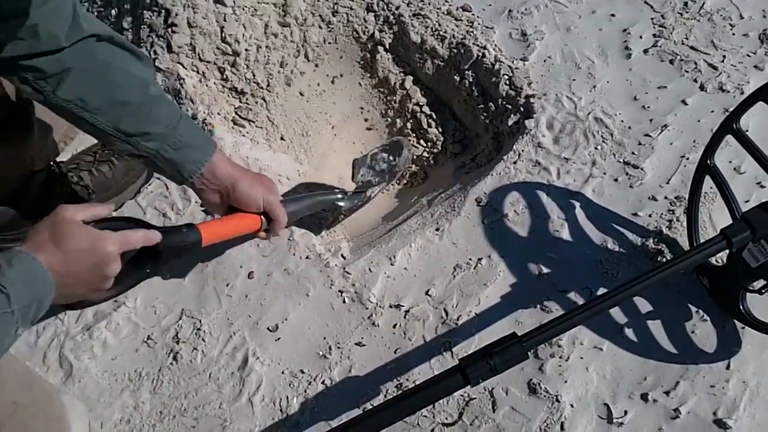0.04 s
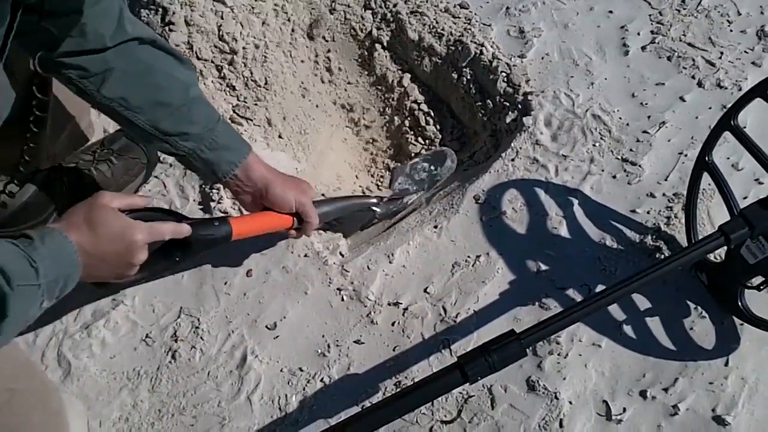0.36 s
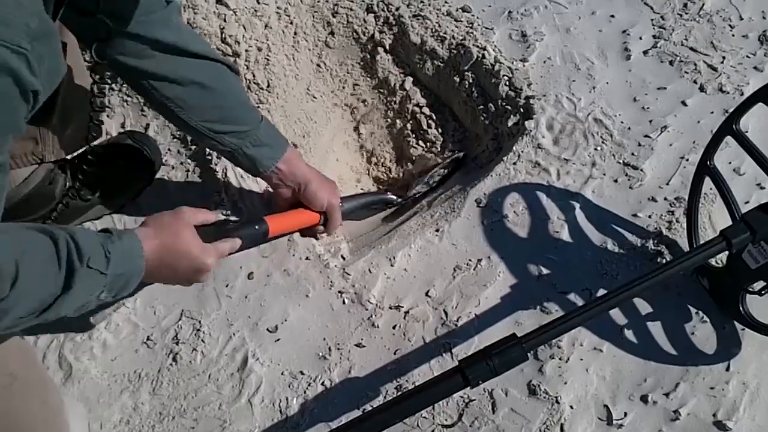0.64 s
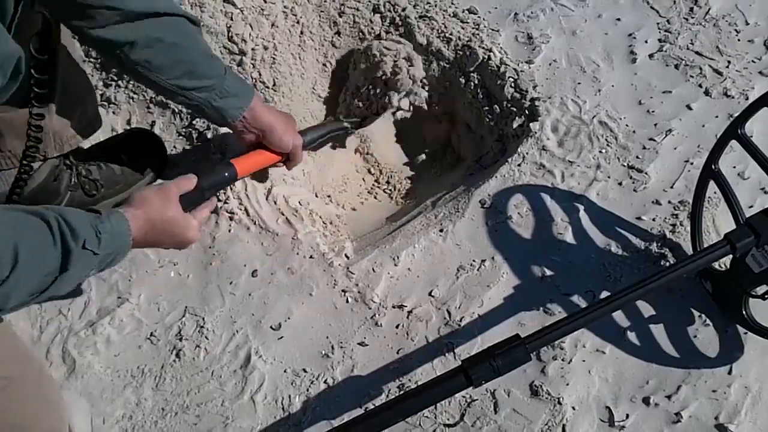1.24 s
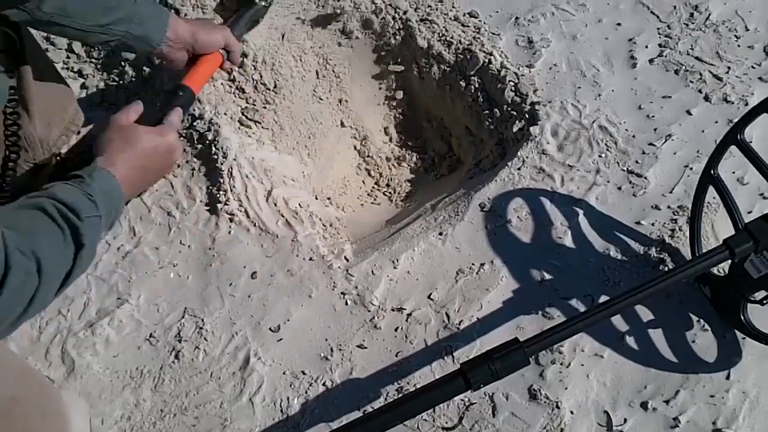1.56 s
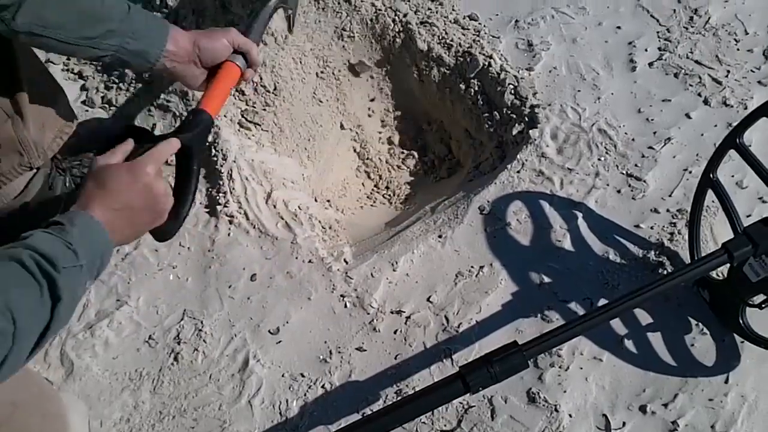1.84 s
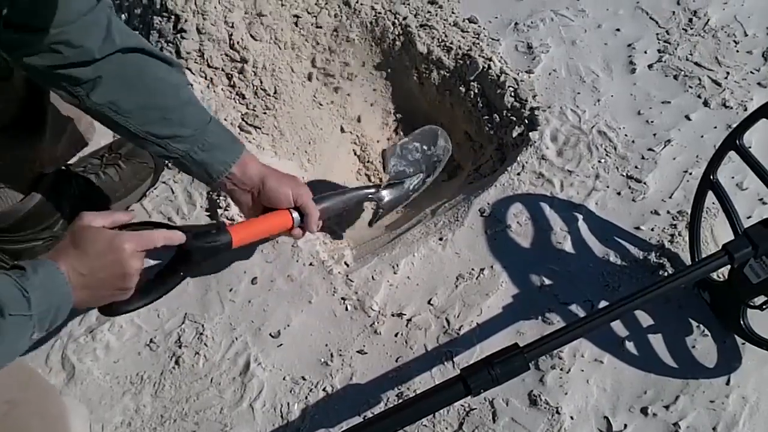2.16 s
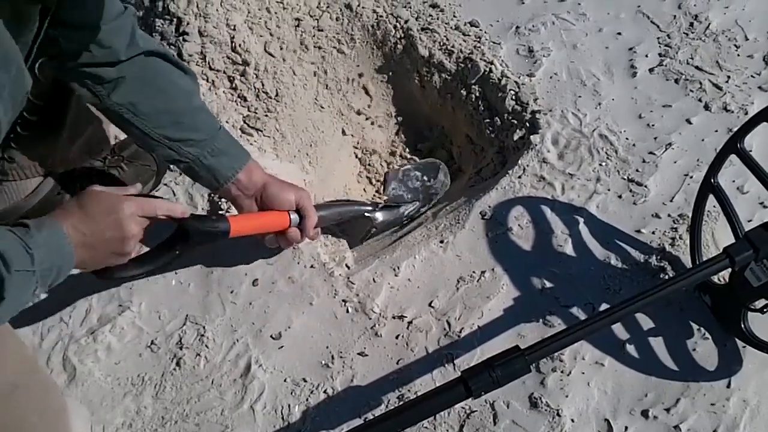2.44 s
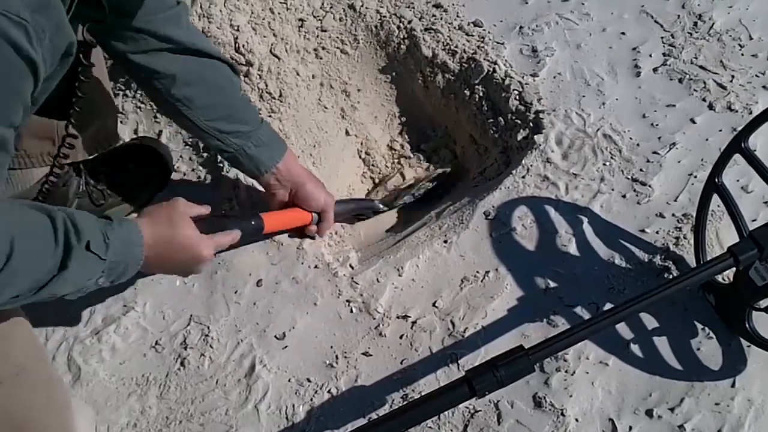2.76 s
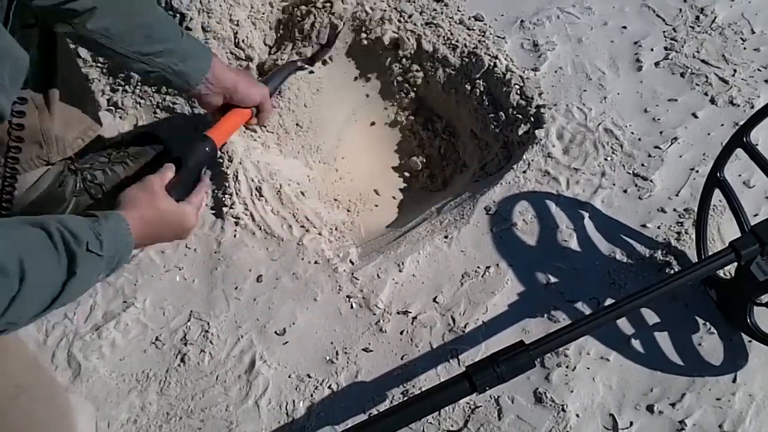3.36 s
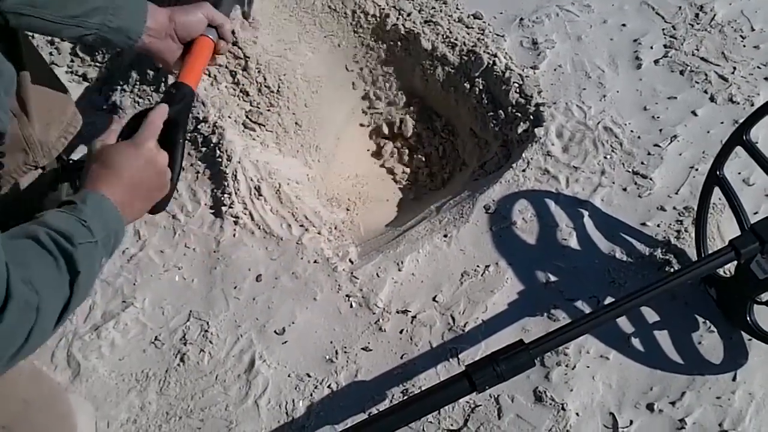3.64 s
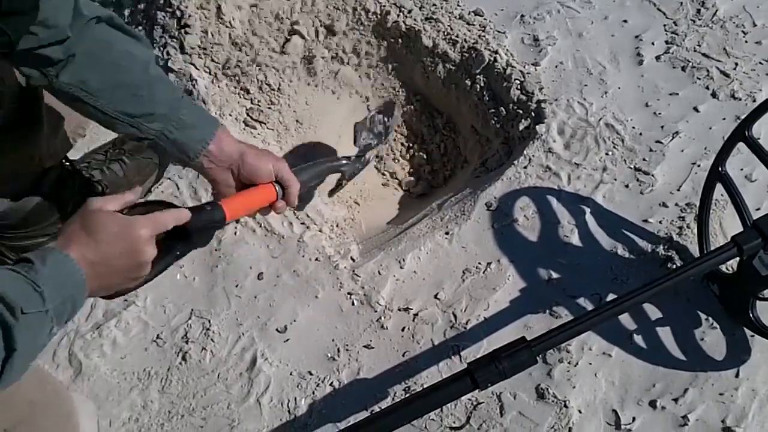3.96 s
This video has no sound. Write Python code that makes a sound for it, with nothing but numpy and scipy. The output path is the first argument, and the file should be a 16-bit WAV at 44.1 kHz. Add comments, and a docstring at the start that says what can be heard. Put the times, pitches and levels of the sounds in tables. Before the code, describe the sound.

Two gritty shovel scoops in dry sand, close by, over gusty wind rumble.

```python
"""Outdoors on dry sand, a short steel shovel digs twice, close by. Friction among the grains makes a
swelling hiss as the blade pushes in; then it lifts its load, and sand crumbles and slides off the edges.
The rubbed steel rings and rasps, and a little loose sand spills. Turbulent wind strikes the microphone
in gusts and single eddies, over a faint outdoor hush."""
import sys
import numpy as np
from scipy.fft import rfft, irfft, next_fast_len
from scipy.io import wavfile
from scipy.ndimage import uniform_filter1d, map_coordinates

SR = 44100
rng = np.random.default_rng(int(sys.argv[2]) if len(sys.argv) > 2 else 0)


def wav_record(signal):
    """Record a signal, one row per channel, as 16-bit PCM in the file named by sys.argv[1]."""
    frames = np.transpose(np.atleast_2d(signal))
    bounded = np.clip(frames, -1, 1)
    # unit amplitude maps onto the largest positive 16-bit level
    quanta = np.round(bounded * 32767).astype(np.int16)
    wavfile.write(sys.argv[1], SR, quanta)


N = 176400
t = np.arange(N) / SR


def amp(db):
    """Amplitude ratio of a level in decibels."""
    return 10 ** (np.asarray(db) / 20)


def unit(x):
    """Normalisation to an rms of 1."""
    return x / np.sqrt(np.mean(x ** 2) + 1e-20)


def contour(points):
    """Linear interpolation of a level in dB over time, silent outside its points."""
    return np.interp(t, *np.transpose(points), left=-120, right=-120)


def pulse(centre_s, sigma_s):
    """Gaussian envelope with a peak of 1."""
    return np.exp(-.5 * ((t - centre_s) / sigma_s) ** 2)


def wobble(knots_per_s):
    """Smooth random modulation: a spline through soft-limited knots."""
    knots = 2 * np.tanh(rng.standard_normal(int(N * knots_per_s / SR) + 4) / 2)
    return map_coordinates(knots, [np.arange(N) * knots_per_s / SR])


def filtered(x, response):
    """Linear filtering: the spectrum is multiplied by a frequency response."""
    size = next_fast_len(N + SR // 2)
    return irfft(rfft(x, size) * response(np.fft.rfftfreq(size, 1 / SR)), size)[:N]


def coloured(x, points):
    """Spectral shaping by (Hz, dB) points joined on a logarithmic frequency axis."""
    f, db = np.transpose(points)
    return filtered(x, lambda hz: amp(np.interp(np.log(hz + 1), np.log(f + 1), db)))


def noise(spectrum):
    """Coloured Gaussian noise at rms 1."""
    return unit(coloured(rng.standard_normal(N), spectrum))


def grains(spectrum, per_s, scatter_db, clump_db, clumps_per_s):
    """Shot noise at rms 1: tiny random collisions of uneven size, swelling in clumps."""
    hits = (rng.random(N) < per_s / SR) * rng.standard_normal(N)
    size_db = scatter_db * np.clip(rng.standard_normal(N), -2, 2) + clump_db * wobble(clumps_per_s)
    return unit(coloured(hits * amp(size_db), spectrum))


def resonant(hz, width_hz):
    """A resonance driven by friction: narrow-band noise at rms 1, whose centre may move."""
    phase = 2 * np.pi * np.cumsum(hz * np.ones(N)) / SR
    lowpass = lambda f: 1 / (1 + 1j * f / (0.67 * width_hz)) ** 2
    drift = lambda: filtered(rng.standard_normal(N), lowpass)
    return unit(drift() * np.cos(phase) + drift() * np.sin(phase))


# The sand's hiss, one table per scoop. Each row: time in seconds, relative level in dB.
HISS_LEVELS = [
    [(0.36, -85), (0.372, -51.5), (0.394, -56), (0.42, -47.5), (0.538, -41), (0.564, -35), (0.77, -38),
     (0.818, -50.5), (0.828, -46), (0.89, -39.5), (0.994, -41), (1.02, -47), (1.054, -41), (1.118, -38.5),
     (1.154, -48.5), (1.2, -37.5), (1.242, -41.5), (1.326, -39.5), (1.336, -42.5), (1.418, -45.5),
     (1.448, -59), (1.458, -51), (1.502, -51.5), (1.512, -68), (1.53, -69)],
    [(2.37, -79), (2.376, -105), (2.384, -53), (2.39, -44), (2.464, -40.5), (2.478, -43.5), (2.63, -33),
     (2.746, -34), (2.88, -43), (2.93, -39), (3.028, -48), (3.094, -42.5), (3.118, -46.5), (3.17, -40.5),
     (3.194, -43), (3.216, -43), (3.246, -45), (3.264, -43.5), (3.32, -46.5), (3.39, -48), (3.434, -56),
     (3.452, -85), (3.46, -64)],
]
# One entry per scoop: the time in seconds at which the push turns into the lift.
LIFT_TIMES = [0.785, 2.82]
# Spectra of sand rubbing on the blade, sand sliding off it and clods breaking up.
# Each row: frequency in Hz, relative spectral density in dB.
PUSH_SPECTRUM = [(300, -44), (700, -17.5), (1100, -9), (1450, -12), (1800, -6.5), (2200, -5), (3200, -0.5),
                 (4400, 4), (6200, -4.5), (9400, -5.5), (12000, -8), (15000, -21)]
SLIDE_SPECTRUM = [(300, -16), (700, -5.5), (1200, -7), (1800, -7), (2300, -5), (3600, 1), (4600, 2),
                  (6300, -5), (9500, -6.5), (12000, -9), (15000, -16)]
CRUMBLE_SPECTRUM = [(200, 5), (500, -4.5), (850, -9.5), (1300, 1.5), (2200, 14), (5000, -45)]


def digging(turn_s=0.14, push_db=6.5, slide_db=4):
    """Granular friction: sand rubs on the entering blade, then slides off; clods crumble throughout."""
    out = np.zeros(N)
    for levels, lift_s in zip(HISS_LEVELS, LIFT_TIMES):
        hiss_db = contour(levels)
        lifted = .5 + .5 * np.tanh((t - lift_s) / turn_s)
        push = grains(PUSH_SPECTRUM, per_s=16000, scatter_db=0.5, clump_db=0.82, clumps_per_s=160)
        slide = grains(SLIDE_SPECTRUM, per_s=9000, scatter_db=-3, clump_db=2.0, clumps_per_s=80)
        clods = grains(CRUMBLE_SPECTRUM, per_s=2500, scatter_db=3, clump_db=6.5, clumps_per_s=60)
        hiss = amp(push_db) * np.sqrt(1 - lifted) * push + amp(slide_db) * np.sqrt(lifted) * slide
        crumble_db = -58.5 + 0.76 * (hiss_db + 40)  # grows more slowly than the hiss
        out += amp(hiss_db) * hiss + amp(crumble_db) * clods
    return out


# The blade's hollow resonance, one table per scoop. Each row: time in seconds, relative level in dB.
RING_LEVELS = [
    [(0.36, -68), (0.372, -57), (0.572, -42.5), (0.778, -44), (0.81, -53.5), (0.918, -53), (1.0, -58),
     (1.33, -53), (1.5, -77)],
    [(2.38, -79), (2.442, -44), (2.498, -47.5), (2.554, -36.5), (2.7, -47), (2.79, -49), (3.152, -47),
     (3.386, -67), (3.44, -77)],
]


def blade_ring(start_hz=1871, sag_hz_per_s=150, gain_db=-2):
    """Mass loading: the rubbed steel's resonance, damped by sand, falls in pitch as the blade fills."""
    out = np.zeros(N)
    for levels in RING_LEVELS:
        start_s = levels[0][0]
        hz = start_hz - sag_hz_per_s * (t - start_s)
        out += amp(gain_db + contour(levels)) * resonant(hz, width_hz=270)
    return out


# Rasps on the steel. Each row: centre in seconds, level in dB, Gaussian sigma in seconds, pitch in Hz.
BLADE_RASPS = [(0.554, -40, 0.011, 3970), (1.091, -40.5, 0.035, 3560), (1.206, -42, 0.0073, 4130),
               (1.414, -46.5, 0.013, 4500), (2.409, -39.5, 0.011, 4540), (2.933, -43, 0.029, 3510),
               (3.219, -39, 0.0081, 4340)]


def rasps(width_hz=650, overtone_ratio=1.88, overtone_db=-4.5):
    """Frictional excitation: packed sand briefly drives two inharmonic resonances on the blade."""
    out = np.zeros(N)
    for centre_s, db, sigma_s, hz in BLADE_RASPS:
        rasp = resonant(hz, width_hz) + amp(overtone_db) * resonant(hz * overtone_ratio, width_hz)
        out += amp(db) * pulse(centre_s, sigma_s) * rasp
    return out


# Small spills of sand. Each row: centre in seconds, level in dB, Gaussian sigma in seconds.
SAND_SPILLS = [(0.377, -52, 0.0017), (1.465, -49, .006), (1.812, -58.5, 0.036), (1.831, -55, .004),
               (3.719, -59, 0.03), (3.886, -57, 0.0048)]


def spills():
    """Impact noise: the collisions of loose grains add up to brief, bright patters."""
    swell = sum(amp(db) * pulse(centre_s, sigma_s) for centre_s, db, sigma_s in SAND_SPILLS)
    spectrum = [(500, -27), (3000, -8), (6500, -5), (10000, -10), (15000, -18)]
    return swell * grains(spectrum, per_s=6500, scatter_db=1.0, clump_db=4.5, clumps_per_s=150)


# The wind's low rumble and the gusts' higher flutter. Each row: time in seconds, relative level in dB.
RUMBLE_LEVELS = [(0.0, -39), (0.11, -54), (0.18, -36), (0.33, -53), (0.54, -30), (0.67, -40.5), (0.76, -28),
                 (0.97, -44.5), (1.21, -34), (1.26, -45.5), (1.65, -31), (1.89, -41), (2.41, -32.5),
                 (2.43, -35), (2.56, -28.5), (2.81, -31.5), (2.85, -24), (3.27, -33), (3.34, -27),
                 (3.53, -35), (3.65, -28.5), (4.0, -27.5)]
GUST_LEVELS = [(0, -52.5), (.1, -58.5), (.2, -51), (.3, -50.5), (.46, -56.5), (.57, -41), (.69, -48),
               (.76, -42.5), (.85, -54.5), (1.1, -57.5), (1.22, -48), (1.32, -57.5), (1.45, -43),
               (1.5, -61), (1.64, -37), (1.73, -45.5), (1.9, -52.5), (2.08, -54), (2.13, -48.5),
               (2.31, -53.5), (2.4, -45), (2.45, -50), (2.5, -35.5), (2.7, -40), (2.78, -57), (2.89, -37.5),
               (2.99, -43), (3.12, -36.5), (3.23, -50), (3.3, -42), (3.36, -34.5), (3.55, -50.5),
               (3.67, -43.5), (3.84, -45), (3.9, -38), (4, -44)]
# Their spectra. Each row: frequency in Hz, relative spectral density in dB.
RUMBLE_SPECTRUM = [(10, -1.5), (28, 1.5), (50, 0.5), (90, -2), (140, -3), (200, -19.5), (300, -40.5),
                   (500, -40.5), (1000, -75), (3000, -100)]
FLUTTER_SPECTRUM = [(60, -26.5), (140, 3), (260, 5), (450, -8.5), (700, -20), (1500, -58), (4000, -100)]


def wind(buffet_db=3.5, flicker_db=4.8, surge_share=0.52, rumble_gain_db=-1, flutter_gain_db=-2):
    """Turbulent pressure on the microphone: flutter and rumble share their buffeting and quick surges."""
    gust_db = np.interp(t, *np.transpose(GUST_LEVELS))
    surge_db = gust_db - uniform_filter1d(gust_db, size=SR // 4)
    rumble_db = np.interp(t, *np.transpose(RUMBLE_LEVELS)) + surge_share * surge_db
    buffeting = amp(buffet_db * wobble(knots_per_s=32))
    rumble = unit(noise(RUMBLE_SPECTRUM) * buffeting)
    flutter = unit(noise(FLUTTER_SPECTRUM) * buffeting * amp(flicker_db * wobble(knots_per_s=70)))
    return amp(rumble_db + rumble_gain_db) * rumble + amp(gust_db + flutter_gain_db) * flutter


# Eddies at the microphone. Each row: centre in seconds, relative level in dB, time scale in milliseconds.
EDDY_THUMPS = [(.189, -17.5, 1.44), (0.497, -21.5, 2.6), (0.55, -17, 1.8), (.566, -23.5, 0.97),
               (0.748, -25, 1.16), (.761, -21, 0.85), (0.778, -22.5, 2.9), (1.201, -22, 2.45),
               (1.442, -24, 1.38), (1.575, -22.5, 1.9), (1.591, -17.5, 0.56), (1.662, -16, 1.46),
               (2.002, -19.5, 3.9), (2.136, -24, 1.3), (2.23, -23.5, 1.23), (2.351, -12.5, 2.7),
               (2.394, -12, 1.08), (2.401, -17.5, 0.79), (2.499, -16.5, 1.76), (2.529, -25.5, 1.2),
               (2.544, -24, 0.65), (2.575, -10.5, 2.14), (2.613, -12, 1.57), (2.719, -18, 1.06),
               (2.864, -17, 1.43), (2.883, -25, 1.04), (2.896, -14, 0.99), (2.914, -18, 1.2),
               (2.956, -20.5, 0.8), (3.029, -19.5, 1.27), (3.078, -22, 0.72), (3.109, -17, 0.94),
               (3.141, -23.5, 0.74), (3.339, -9.5, 2), (3.347, -17, 0.95), (3.359, -10.5, 2.36),
               (3.379, -15, 0.61), (3.433, -18.5, 1.32), (3.462, -16, 1.45), (3.672, -18.5, 2.4),
               (3.750, -14.5, 0.79), (3.905, -14, 1.53), (3.916, -22, 0.75)]
# The colour of their thumps. Each row: frequency in Hz, gain in dB.
EDDY_RESPONSE = [(20, -11), (50, -4), (100, -1), (200, -2), (1000, -0.5)]


def eddies():
    """Pressure transients: each eddy is one swing and rebound; the shorter it is, the wider its band."""
    pressure = np.zeros(N)
    phases = rng.uniform(-np.pi, np.pi, len(EDDY_THUMPS))  # set how lopsided each swing is
    for (centre_s, db, scale_ms), phase in zip(EDDY_THUMPS, phases):
        scaled_time = (t - centre_s) * 1000 / scale_ms
        pressure += amp(db) * np.real(np.exp(1j * phase) / (1 + 1j * scaled_time / 3) ** 4)
    return coloured(pressure, EDDY_RESPONSE)


# The distant outdoor hush. Each row: frequency in Hz, relative spectral density in dB.
HUSH_SPECTRUM = [(30, 3), (200, -3), (550, -2.5), (1000, -3.5), (2000, -8), (3600, -10), (4800, -10.5),
                 (6200, -14), (9500, -16), (12000, -17), (15000, -14.5)]


def hush(level_db=-57):
    """Stationary broadband noise: the faint background of the open air."""
    return amp(level_db) * noise(HUSH_SPECTRUM)


def scene():
    """Superposition: the sounds of shovel, sand and air add at one microphone."""
    air = wind() + eddies() + hush()
    return (digging() + blade_ring() + rasps() + spills() + air)[None]


# The microphone's colour. Each row: frequency in Hz, gain in dB.
MIC_RESPONSE = [(1000, 1), (4900, -1.5), (5250, -11.5), (6000, -9), (15000, -12.5)]
# Its notches. Each row: centre frequency in Hz, width in Hz.
MIC_NOTCHES = [(2720, 784), (5490, 620), (7850, 2480), (10920, 950)]


def record(dry):
    """Frequency response: the microphone dulls the treble, cuts four notches and limits the band."""
    def response(f, top_hz=15300):
        notches = [(hz ** 2 - f ** 2) / (hz ** 2 - f ** 2 + 1j * f * width) for hz, width in MIC_NOTCHES]
        return np.prod(notches, axis=0) * (f < top_hz)
    return filtered(coloured(dry[0], MIC_RESPONSE), response)[None]


dry = scene()
out = record(dry)
wav_record(out)
```